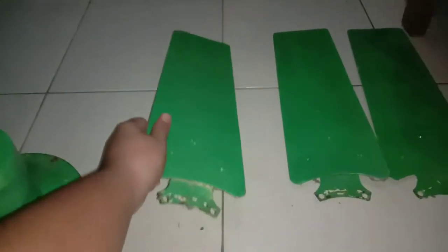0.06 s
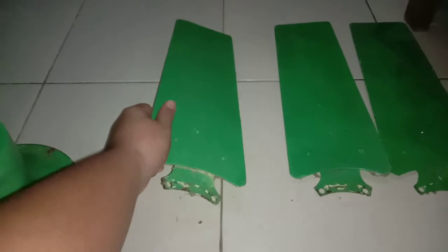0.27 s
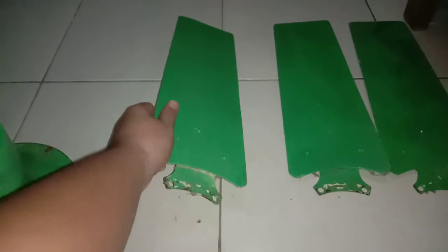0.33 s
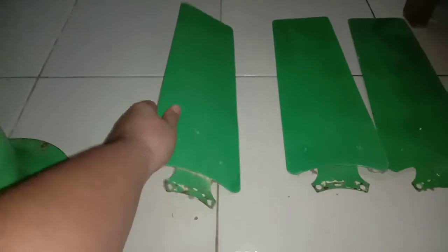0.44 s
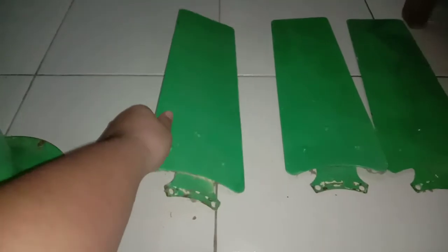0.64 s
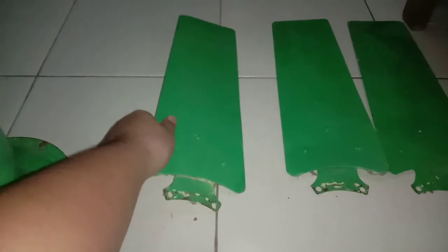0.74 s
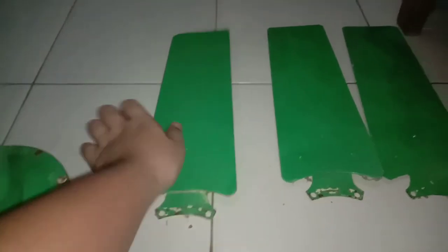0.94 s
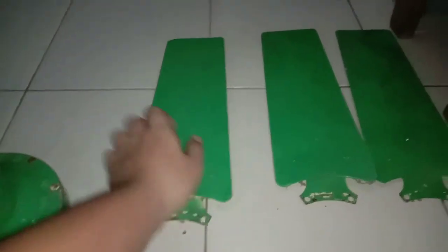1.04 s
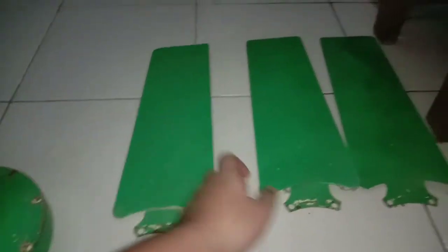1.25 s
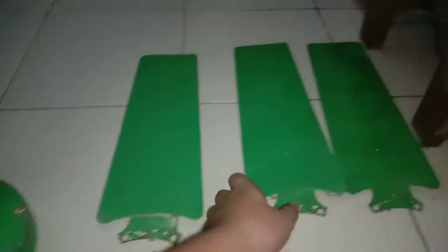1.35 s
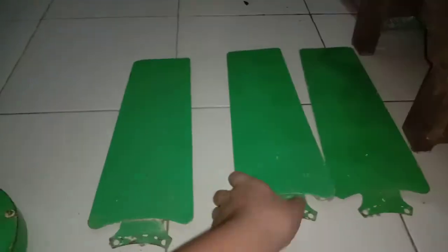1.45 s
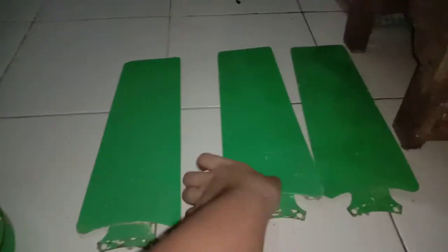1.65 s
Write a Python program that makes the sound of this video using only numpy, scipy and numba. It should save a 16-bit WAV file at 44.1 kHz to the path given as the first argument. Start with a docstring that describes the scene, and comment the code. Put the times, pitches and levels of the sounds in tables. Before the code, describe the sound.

Ringing metal clatter comes from a fan blade being laid on tiles indoors. Light taps lead to a bright rattle, a brief pause, then more chattering with dull bumps, dying away with a slight room echo.

```python
"""A sheet-metal ceiling fan blade is set down by hand on a tile floor in a small, quiet room.
Its bracket scrapes faintly and taps, then clatters while the blade is still held; each impact excites
the plate's normal modes, heard as a crack and a ring that the walls reverberate. The blade drops flat
and chatters with dull bumps, a low mode swells and fades as it comes to rest, and a last knock follows.
The hand moves on with a faint rub and a thin squeak."""
import sys
import numpy as np
from scipy import signal
from scipy.fft import rfft, irfft
from scipy.io import wavfile
from scipy.ndimage import uniform_filter1d
from numba import njit

SR = 44100
rng = np.random.default_rng(int(sys.argv[2]) if len(sys.argv) > 2 else 0)


def int16_out(signal):
    """Quantize to a 16-bit WAV file."""
    q = np.round(np.clip(np.atleast_2d(signal).T, -1, 1) * 32767)
    wavfile.write(sys.argv[1], SR, q.astype(np.int16))


N = 74970
TAPS_END_S, FLAT_S = .35, .83  # the grip loosens; the blade lies flat


def undb(db):
    """Amplitude ratio of a level in dB."""
    return 10 ** (np.asarray(db) / 20)


def along(points, hz):
    """Interpolation of (f/Hz, value) points on a logarithmic frequency axis."""
    f, v = np.array(points, float).T
    return np.interp(np.log(np.maximum(hz, 1)), np.log(f), v)


def noise(spectrum):
    """Spectral shaping of white noise, scaled to unit rms."""
    hz = np.arange(N // 2 + 1) * SR / N
    shaped = irfft(rfft(rng.standard_normal(N)) * undb(along(spectrum, hz)), N)
    return shaped / shaped.std()


# Background spectrum: f/Hz, relative level/dB
AMBIENT_SPECTRUM = [(30, -32), (92, -10), (139, -13.5), (645, -19.5), (754, -16), (881, -23.5),
                    (1240, -14.5), (1600, -28), (6700, -25), (15000, -59)]

def ambience():
    """Stationary random noise: the quiet of the room."""
    return undb(-61) * noise(AMBIENT_SPECTRUM)


# Friction spectrum of bracket on tile: f/Hz, relative level/dB
SCRAPE_SPECTRUM = [(3500, -44), (5200, 6), (8000, -30)]

def scrape(t, peak_s=.1, width_s=.032):
    """Sliding friction: the bracket hisses faintly before the first tap."""
    return undb(-60.5) * noise(SCRAPE_SPECTRUM) * np.exp(-((t - peak_s) / width_s) ** 2)


# Impacts on the tiles: t/s, then excitation level/dB of the low ring, clang, treble and top bands
IMPACTS = [ (0.2164, -37, -20.5, -18.5, -28.5), (0.2581, -43, -32.5, -27.5, -36.5),
           (0.4334, -31.5, -25, -17.5, -27), (0.4625, -28.5, -24, -25.5, -31.5),
           (0.4718, -28, -26, -16.5, -27), (.478, -28.5, -22, -27, -33), (.495, -25.5, -24, -24, -33),
           (0.529, -31.5, -21, -19, -31), (0.5462, -27, -30.5, -19.5, -27), (0.5715, -34, -22.5, -23, -24),
           (.577, -32, -22.5, -21, -31.5), (.596, -29.5, -24, -22.5, -31.5), (0.6215, -27, -21.5, -22, -33),
           (.646, -30.5, -28.5, -31, -44), (0.8109, -76, -50.5, -41, -42.5), (.847, -51.5, -51, -45.5, -61),
           (0.8593, -43, -29.5, -21, -23), (0.8737, -33.5, -23, -19.5, -57), (.9, -36, -31.5, -37, -66),
           (.9229, -37, -19, -17.5, -46), (.929, -51, -30.5, -29, -46), (0.9448, -62, -58, -51, -24.5),
           (0.9624, -52, -29.5, -27, -23.5), (0.981, -39, -30, -23.5, -38),
           (.998, -28.5, -24.5, -23.5, -27), (1.017, -30.5, -19.5, -20.5, -31),
           (1.0299, -41.5, -30, -23, -22.5), (1.0528, -35.5, -21, -20, -29), (1.069, -46, -43, -25, -26),
           (1.088, -37, -24.5, -24, -26), (1.104, -44.5, -21, -30.5, -42), (1.1239, -38, -32, -22, -24),
           (1.155, -32.5, -24, -28.5, -37), (1.1764, -48, -28.5, -22, -23.5), (1.203, -41, -28.5, -33, -36),
           (1.2223, -54, -38.5, -31, -34), (1.25, -46.5, -35.5, -32, -61), (1.275, -42, -34.5, -36, -41.5),
           (1.3574, -43, -35, -35, -43), (1.3689, -39.5, -28, -24, -30.5), (1.376, -55, -32, -36, -37)]

def impacts():
    """Inelastic collision: weaker contacts trail the loose blade's impacts. Gives samples, band gains."""
    rows = np.array(IMPACTS)
    times, db = rows[:, 0], rows[:, 1:]
    loose, flat = times > TAPS_END_S, times > FLAT_S
    # impacts followed, longest delay/s, relative level/dB
    rebound, flat_rebound, sliding_catch = (loose, .014, -6.5), (flat, .028, -6.5), (loose, .04, -13.5)
    followers = [rebound, flat_rebound, sliding_catch, sliding_catch]
    delay_shares = rng.uniform(.2, 1, (len(rows), 4))
    all_times, all_db = [times], [db]
    for share, (which, within_s, weaker_db) in zip(delay_shares.T, followers):
        all_times.append((times + within_s * share)[which])
        all_db.append(db[which] + weaker_db)
    times, gains = np.concatenate(all_times), undb(np.concatenate(all_db))
    order = np.argsort(times)
    return (times[order] * SR).astype(int), gains[order]


@njit
def ring(hz, t60, starts, kicks, in_step):
    """Damped oscillators under impulses (impacts x modes); those in step gain energy but keep phase."""
    out = np.zeros(N)
    pole = np.exp((2j * np.pi * hz - np.log(1000) / t60) / SR)
    phasor, k = np.zeros(len(hz), np.complex128), 0
    for i in range(N):
        while k < len(starts) and starts[k] <= i:
            for m in range(len(hz)):
                amplitude = abs(phasor[m])
                if in_step[m] and amplitude > 1e-9:
                    phasor[m] *= np.hypot(amplitude, kicks[k, m]) / amplitude
                else:
                    phasor[m] += kicks[k, m]
            k += 1
        for m in range(len(hz)):
            phasor[m] *= pole[m]
            out[i] += phasor[m].imag
    return out


# Limits of the four bands: f/Hz
BAND_EDGES = [150, 1550, 3200, 8500, 16000]
# Share of the dense modes in each band: level/dB
DENSE_SHARE = [-7, -4.5, -4, -3.5]
# Their spectral envelope: f/Hz, relative level/dB
DENSE_SPECTRUM = [(150, -19), (400, -13.5), (650, -6), (780, -10), (950, -2.5), (1120, 9.5), (1300, 10),
                  (1520, -5), (1750, -6), (1950, 9.5), (2300, 2.5), (2550, 3.5), (2850, 2), (3250, -4),
                  (3700, -5), (4300, -6), (4950, -4), (5850, 0), (6600, -4), (7300, -3), (8400, -15),
                  (10300, -13.5), (12000, -19.5), (13800, -12.5), (14600, -2.5), (15200, 2.5),
                  (15800, -4.5)]
# Their random unevenness: f/Hz, spread of level/dB
DENSE_SPREAD = [(2500, 0), (4500, 0.5)]

def dense_modes(count):
    """Constant modal density of a thin plate: frequencies, and random amplitudes for each impact."""
    grid = np.linspace(BAND_EDGES[0], BAND_EDGES[-1], 520)
    hz = grid[:-1] + np.diff(grid) * rng.random(len(grid) - 1)
    band = np.searchsorted(BAND_EDGES, hz) - 1
    singly = rng.standard_normal(len(hz))
    in_clusters = uniform_filter1d(rng.standard_normal(len(hz)), size=5)
    size = undb(along(DENSE_SPECTRUM, hz) + along(DENSE_SPREAD, hz) * (singly + in_clusters))
    band_energy = np.bincount(band, size ** 2)
    size *= (undb(DENSE_SHARE) / np.sqrt(band_energy))[band]
    return hz, size * rng.standard_normal((count, len(hz)))


# Each strong mode with the blade held: relative level/dB
HELD_LEVELS = [-24, -27, -17.5, -19, -18, -10.5, -3.5, -5, -1.5, -36, -30, -10, -21, -27, -5, -17, -4.5, -3,
               -12, -7.5, -13.5, -11, -5, -30, -38, -13, -9, -8.5]
# The same modes with the blade flat: relative level/dB
FLAT_LEVELS = [-42, -24, -34, -23, -28, -22, -7.5, -6, -10, -4, -13.5, -11.5, -14.5, -5, -8, -12, -31, -11,
               -13.5, -13, -7, -33, -33.5, -6, -8.5, -20, -24, -20]

def strong_modes(starts):
    """Boundary conditions, held or flat, set how hard an impact drives each strong mode."""
    held = starts[:, None] < FLAT_S * SR
    size = undb(np.where(held, HELD_LEVELS, FLAT_LEVELS) - 3.5)
    return size * np.sign(rng.standard_normal(size.shape))


# Natural frequencies of the strong modes: f/Hz
STRONG_HZ = [212, 345, 684, 866, 977, 1073, 1130, 1256, 1280, 1344, 1707, 1871, 1914, 2006, 2060, 2110,
             2208, 2278, 2670, 2745, 2790, 2912, 2962, 3610, 3930, 4736, 5230, 5748]
# Damping of the strong modes: f/Hz, T60/s
STRONG_DECAY = [(200, 0.23), (680, 0.82), (870, 0.21), (1270, 0.32), (1870, 0.37), (2010, 0.18),
                (6000, 0.14)]
# Damping of the dense modes: f/Hz, T60/s
DENSE_DECAY = [(200, 0.22), (1200, 0.31), (2500, 0.26), (6000, 0.15), (11000, 0.068), (15000, 0.059)]

def blade(starts, gains, crack_t60_s=.046, clink_hz=6450, clink_width_hz=650, choke_hz=1490):
    """Modal superposition: at each impact the dense modes crack, then ring with the strong ones."""
    dense_hz, dense = dense_modes(len(starts))
    ring_hz = np.r_[dense_hz, STRONG_HZ]
    tap = starts[:, None] < TAPS_END_S * SR
    # In the first taps the bracket's resonance brightens the crack and the firm grip chokes the ring.
    clink_db = 12 * tap * np.exp(-((dense_hz - clink_hz) / clink_width_hz) ** 2)
    choke_db = -12.5 * tap * (ring_hz > choke_hz)
    crack = dense * undb(clink_db - 5)
    ringing = np.c_[dense, strong_modes(starts)] * undb(choke_db)
    kicks = np.sqrt(2) * np.c_[crack, ringing]
    hz = np.r_[dense_hz, ring_hz]
    ring_t60 = np.r_[along(DENSE_DECAY, dense_hz), along(STRONG_DECAY, STRONG_HZ)]
    t60 = np.r_[np.full(len(dense_hz), crack_t60_s), ring_t60]
    in_step = np.r_[np.zeros(2 * len(dense_hz), bool), [1000 < f < 2250 for f in STRONG_HZ]]
    out = 0
    for gain, lo, hi in zip(gains.T, BAND_EDGES, BAND_EDGES[1:]):
        own = (hz >= lo) & (hz < hi)
        drive = np.ascontiguousarray(kicks[:, own] * gain[:, None])
        bandpass = signal.butter(6, [lo * .85, hi * 1.15], "band", fs=SR, output="sos")
        out += signal.sosfilt(bandpass, ring(hz[own], t60[own], starts, drive, in_step[own]))
    return out


def reverberation(x, t, low_t60_s=.37, treble_t60_s=.25, build_s=.036):
    """Diffuse field: reflections from hard walls decay exponentially, the treble sooner."""
    white = rng.standard_normal(N)
    low = signal.sosfilt(signal.butter(1, 3500, fs=SR, output="sos"), white)
    tail = low * undb(-60 * t / low_t60_s) + (white - low) * undb(-60 * t / treble_t60_s)
    tail *= np.clip(t / build_s, 0, 1)
    return undb(-12) * signal.fftconvolve(x, tail / np.linalg.norm(tail))[:N]


# Bumps of the blade's face and the hand on the floor: t/s, f/Hz, level/dB
THUDS = [(0.8716, 572, -40), (0.9218, 660, -38), (.96, 105, -53), (1.335, 93, -56), (1.3563, 434, -46)]

def bumps(t, rise_s=.0041, t60_s=.097, edge_ratio=1.31):
    """Heavy damping: each bump is a short thud, a band of noise around one pitch."""
    out = 0
    for start, hz, db in THUDS:
        bandpass = signal.butter(2, [hz / edge_ratio, hz * edge_ratio], "band", fs=SR, output="sos")
        body = signal.sosfilt(bandpass, rng.standard_normal(N))
        age = np.maximum(t - start, 0)
        out += body / body.std() * np.minimum(age / rise_s, 1) * undb(db - 60 * age / t60_s)
    return out


def settling(t, hz=344.6, peak_s=1.3, width_s=.065):
    """Vibration in a single mode: a low tone swells and fades as the blade comes to rest."""
    return undb(-50.5) * np.sqrt(2) * np.sin(2 * np.pi * hz * t) / np.cosh((t - peak_s) / width_s)


# Friction spectrum of the hand: f/Hz, relative level/dB
RUB_SPECTRUM = [(100, -18.5), (346, -3.5), (800, -15), (1240, -4), (1600, -13), (2400, -3.5), (3320, -21),
                (4200, -14.5), (7050, -59)]

def rub(t, start_s=1.275, rise_s=.12):
    """Sliding friction: faint noise as the hand moves on."""
    return undb(-52.5) * noise(RUB_SPECTRUM) * np.clip((t - start_s) / rise_s, 0, 1)


def squeak(t, start_s=1.555, length_s=.13, base_hz=9970, arch_hz=620, jitter_hz=600):
    """Frequency modulation: the hand's thin squeak rises and falls in pitch, with random jitter."""
    progress = np.clip((t - start_s) / length_s, 0, 1)
    arch = np.maximum(np.sin(np.pi * progress), 0)
    hz = base_hz + arch_hz * arch + jitter_hz * rng.standard_normal(N)
    return undb(-70) * np.sqrt(2 * arch) * np.sin(2 * np.pi * np.cumsum(hz) / SR)


def scene():
    """Linear superposition: the clatter, its reverberation and the faint sounds add in one channel."""
    t = np.arange(N) / SR
    clatter = blade(*impacts()) + bumps(t)
    echo = reverberation(clatter, t)
    return (scrape(t) + clatter + echo + settling(t) + rub(t) + squeak(t) + ambience())[None]


def record(dry, ceiling=.63, cutoff_hz=15550):
    """Soft saturation rounds the highest peaks; a low-pass filter cuts the top."""
    lowpass = signal.ellip(10, .2, 70, cutoff_hz, fs=SR, output="sos")
    return signal.sosfilt(lowpass, ceiling * np.tanh(dry / ceiling))


dry = scene()
out = record(dry)
int16_out(out)
```